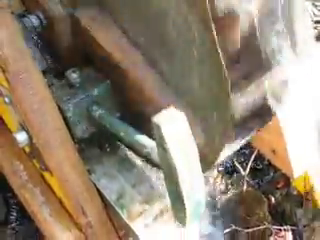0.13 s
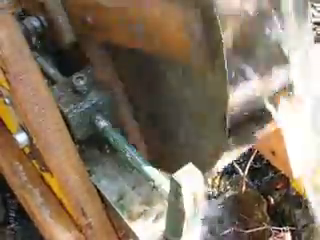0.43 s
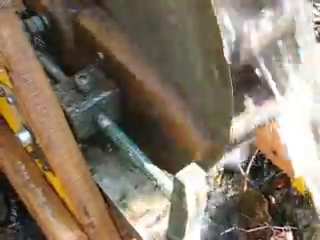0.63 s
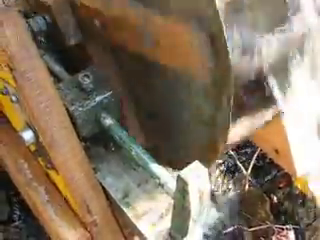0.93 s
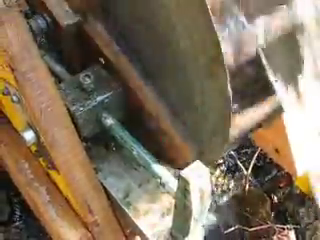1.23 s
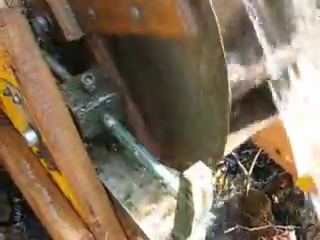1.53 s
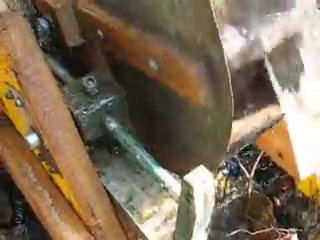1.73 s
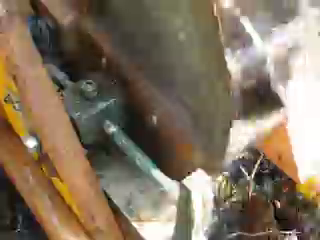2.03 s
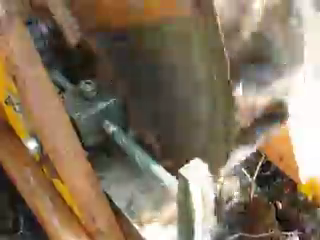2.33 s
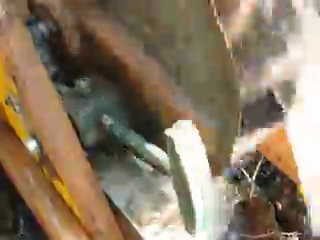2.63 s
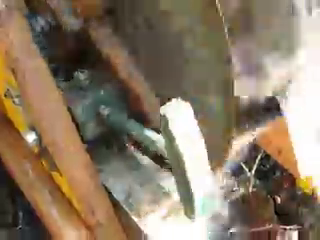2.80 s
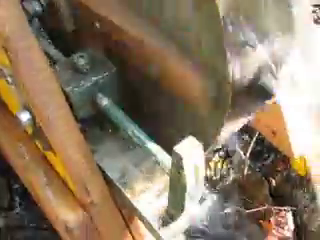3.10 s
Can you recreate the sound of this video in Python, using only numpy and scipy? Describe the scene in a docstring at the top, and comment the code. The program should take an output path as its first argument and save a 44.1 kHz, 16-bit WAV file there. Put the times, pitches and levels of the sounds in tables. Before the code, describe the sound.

Water splashing over a small water wheel, with ringing metal hammer taps and sharp knocks.

```python
"""Small water wheel with a hammer

A wheel turns in a stream, and water splashes over its paddles in a dense spray of drops and bubbles.
Its hammer strikes two ringing metal parts in turn, and moving air rumbles softly on the microphone.
Two sharp knocks and a snap right beside the microphone overload it. After each, the gain control
turns the sound down and slowly lets it back."""
import sys
import numpy as np
from scipy import signal
from scipy.io import wavfile
from scipy.ndimage import uniform_filter1d

SR = 44100
rng = np.random.default_rng(int(sys.argv[2]) if len(sys.argv) > 2 else 0)


def write(x):
    x = np.atleast_2d(x).T
    wavfile.write(sys.argv[1], SR, np.round(np.clip(x, -1, 1) * 32767).astype(np.int16))


N = 143766
TIME = np.arange(N) / SR
LAG_S, LAG_SPREAD_S = .00005, .000075  # how much later water is heard on the left, and how that varies


def from_db(db):
    """Turn decibels into a number to multiply a sound by."""
    return 10 ** (np.asarray(db) / 20)


def unit_power(x):
    """Scale a sound to an average power of one."""
    return x / np.sqrt(np.mean(x ** 2) + 1e-20)


def level_curve(rows):
    """Join (time, level) points into a gain for every sample."""
    return from_db(np.interp(TIME, *np.transpose(rows)))


def at_pitch(rows, hz):
    """Read a (pitch, value) table at any pitch."""
    pitches, values = np.transpose(rows)
    return np.interp(np.log(hz), np.log(pitches), values)


def pan(db):
    """Two gains that make the left side db louder than the right."""
    return from_db(np.array([[.5], [-.5]]) * db)


def band(x, hz, kind, order=2):
    """Keep the lows, the highs or a band; a higher order cuts more steeply."""
    sections = signal.butter(order, np.minimum(hz, .45 * SR), kind, fs=SR, output="sos")
    return signal.sosfilt(sections, x + 1e-18)


def drift(rate_hz):
    """A smooth random wobble about 1 in size, its extremes cut off."""
    pole = np.exp(-80 * np.pi * rate_hz / SR)
    slow = signal.lfilter([1], [1, -2 * pole, pole * pole], rng.standard_normal(N // 40 + 2002))[2000:]
    return np.interp(np.arange(N) / 40, np.arange(len(slow)), np.clip(unit_power(slow), -2.5, 1.5))


def fade(t, ring_s):
    """Die away by 60 dB in ring_s, the ring time."""
    return np.exp(-np.log(1000) * t / ring_s)


def ring(clicks, hz, ring_s):
    """Each click starts a fading tone."""
    decay, angle = fade(1 / SR, ring_s), 2 * np.pi * hz / SR
    return signal.lfilter([1, 0, -1], [1, -2 * decay * np.cos(angle), decay * decay], clicks + 1e-18)


def add(out, start_s, sound):
    """Mix a sound in at its start time."""
    start = int(start_s * SR)
    end = min(start + sound.shape[-1], N)
    out[:, start:end] += sound[:, :end - start]


def impacts(per_s, spread_db):
    """Random clicks of uneven size, each arriving from its own direction."""
    at = np.flatnonzero(rng.random(N) < per_s / SR)
    size, side = rng.random((2, N), dtype=np.float32)[:, at]
    size = from_db(spread_db * np.minimum(-np.log(size + 1e-9), 3.4))
    bearing = np.log((side + 1e-6) / (1 - side + 1e-6)) * np.sqrt(3) / np.pi
    lag = np.rint((LAG_S + LAG_SPREAD_S * bearing) * SR).astype(int)
    out = np.zeros((2, N))
    out[0, np.clip(at + lag, 0, N - 1)] = size
    out[1, at] = size
    return out


# Which side the water is heard on: (pitch [Hz], left minus right [dB])
WATER_SIDE = [(200, 0.5), (1000, -0.2), (2300, -6), (4000, -2.3)]
# The tone of the smooth rush: (pitch [Hz], relative level [dB])
RUSH_TONE = [(120, -24.5), (250, -10.5), (380, -19.5), (560, -5), (1000, 0), (1800, -6), (3400, 0.5),
             (6200, -2), (8000, -6)]
def rush(surge_db=1.5, flicker_db=2.5):
    """Countless small splashes merge into flickering noise, alike in both ears only in the bass."""
    out, surge, edges = 0, drift(14), np.geomspace(100, 11500, num=19)
    white = rng.standard_normal((2, 2, N))
    for k, (low, high) in enumerate(zip(edges, edges[1:])):
        middle, side = band(white[k % 2], [low, high], "band")
        hz = np.sqrt(low * high)
        alike = max(np.exp(-.5 * (2 * np.pi * hz * LAG_SPREAD_S) ** 2), .051)
        noise = np.sqrt(1 + alike) * middle + np.sqrt(1 - alike) * side * [[1], [-1]]
        gain = from_db(at_pitch(RUSH_TONE, hz) + surge_db * surge + flicker_db * drift(38))
        out += gain * pan(at_pitch(WATER_SIDE, hz)) * noise
    out[0] = np.roll(out[0], round(LAG_S * SR))
    return from_db(-21.5) * unit_power(out)


# The tone of the falling drops: (pitch [Hz], relative level [dB])
DROP_TONE = [(300, -11), (520, 1), (1000, -6.5), (1800, -3.5), (3300, 6.5), (5000, -3.5), (8000, -6.5)]
def drops(per_s=2200, ring_cycles=14.3):
    """Drops fall in clumps and ring briefly as bubbles; small high ones are the most common."""
    out, pitches, clumps = 0, np.geomspace(330, 8000, num=26), from_db(3.2 * drift(18))
    for hz in pitches:
        clicks = impacts(per_s * clumps * hz / pitches.sum(), spread_db=2.5)
        plinks = unit_power(ring(clicks, hz, ring_cycles / hz))
        gain = np.sqrt(hz) * from_db(at_pitch(DROP_TONE, hz))
        out += plinks * gain * pan(at_pitch(WATER_SIDE, hz))
    return from_db(-25) * unit_power(out)


def splats(fade_s=.0018):
    """Water slaps the paddles in tiny bright bursts."""
    slaps = impacts(per_s=210, spread_db=5.5)
    power = signal.lfilter([1], [1, -np.exp(-2 / (fade_s * SR))], slaps ** 2 + 1e-18)
    bursts = np.sqrt(power) * np.sign(rng.standard_normal((2, N)))
    return from_db(-28.5) * unit_power(band(bursts, [1890, 7370], "band")) * pan(-5.5)


# Loud gulps and drops of water: (time [s], starting pitch [Hz], level [dB])
LOUD_BUBBLES = [(.2119, 4420, -13), (.2345, 3200, -8.5), (.3635, 2480, -8), (.862, 930, -16),
                (1.196, 2470, -11), (1.292, 778, -10), (1.387, 1360, -7), (1.514, 830, -19.5),
                (1.558, 2020, -13.5), (1.590, 1390, -7), (1.662, 638, -16.5), (1.804, 2230, -13.5),
                (1.82, 950, -18), (1.851, 2050, -13.5), (1.878, 515, -15), (1.932, 496, -16),
                (2.226, 567, -14.5), (2.278, 3080, -15), (2.414, 2780, -12), (2.678, 452, -15.5),
                (2.745, 590, -15), (2.8, 668, -14), (2.908, 702, -20), (2.9245, 5250, -11.5)]
def bubbles(quiet_per_s=55, low_hz=900, high_hz=6000, rise=.45, swell_cycles=2.14):
    """Loud bubbles and many quiet random ones swell, then rise in pitch as they die in a little froth."""
    out, t, quiet = np.zeros((2, N)), TIME[:SR // 10], []
    for when, pitch, softness in rng.random((int(quiet_per_s * N / SR), 3)):
        hz = low_hz * (high_hz / low_hz) ** pitch
        db = -21.5 - .5 * min(-np.log(1 - softness), 2)
        quiet.append((when * N / SR, hz, db))
    for start_s, hz, db in LOUD_BUBBLES + quiet:
        ring_s = .064 * min(1, 1000 / hz) ** (2 / 3)  # smaller, higher bubbles die sooner
        tone = np.sin(2 * np.pi * hz * t * (1 + .5 * rise * np.minimum(t / ring_s, 1)))
        froth = .62 * unit_power(ring(rng.standard_normal(len(t)), hz, 1 / (.33 * hz)))
        shape = (1 - np.exp(-t * hz / swell_cycles)) * fade(t, ring_s)
        add(out, start_s, from_db(db) * shape * (tone + froth) * pan(at_pitch(WATER_SIDE, hz)))
    return out


# How loud the water is heard, with an extra dip as the gain drops after the last knock:
# (time [s], level [dB])
WATER_LEVEL = [(0, 1), (.3, -1), (.65, -3), (1.0, -0.5), (1.4, 1), (1.8, 0), (2.2, 2.5), (2.62, 0),
               (2.86, 4), (3.02, -5.5), (3.26, 1.5)]
def water(top_hz=7850):
    """The splashing grows louder and softer; its highest treble is only a faint mist."""
    splashing = (rush() + drops() + splats()) * level_curve(WATER_LEVEL) + bubbles()
    mist = from_db(-12) * band(splashing, top_hz, "high", order=4)
    return band(splashing, top_hz, "low", order=12) + mist


# Air pushing on the microphone: (time [s], level [dB])
AIR_LEVEL = [(0, -49.5), (1.65, -47.5), (1.8, -34), (1.95, -48), (3.26, -44.5)]
def air_rumble():
    """Moving air rumbles separately on each side of the microphone."""
    lows = band(rng.standard_normal((2, N)), 75, "low")
    return unit_power(band(lows, 22.4, "high")) * level_curve(AIR_LEVEL) * pan(3.5)


def struck(tones, lag_s=0):
    """One blow sets a part ringing with several tones, heard lag_s later on the left."""
    out, t = 0, np.maximum(TIME[:SR] - np.array([[lag_s], [0]]), 0)
    for k, (hz, db, ring_s) in enumerate(tones):
        out += (-1) ** k * from_db(db) * np.sin(2 * np.pi * hz * t) * fade(t, ring_s)
    return out


def crack(fade_s=.0017):
    """The instant of contact: a very short burst of noise."""
    burst = rng.standard_normal((2, SR)) * np.exp(-TIME[:SR] / fade_s)
    return band(burst, 7100, "low", order=6)


# The tones of the first metal part: (pitch [Hz], level [dB], ring time [s])
CLANK_TONES = [(1259, -35, 1.2), (2928, -32, 1.0), (3535, -24, .45), (4126, -26.5, .8), (4626, -31, 1.1),
               (6665, -31.5, .6), (9198, -29, .16), (9422, -28, .18)]
# Hammer blows on it: (time [s], strength [dB], favoured pitch [Hz], thud level [dB])
CLANK_BLOWS = [(0.127, -0.5, 4450, -8.5), (.901, -1, 4370, -11), (1.686, -1.5, 6665, -10.5),
               (2.466, 0.5, 3530, -11), (3.243, -1, 3980, -10.5)]
def clanks(boost_db=8, width_octaves=.11, thud_hz=545, thud_ring_s=.024):
    """The hammer ticks on metal and the frame thuds; each spot it hits favours a different pitch."""
    out = np.zeros((2, N))
    for start_s, db, favoured_hz, thud_db in CLANK_BLOWS:
        tones = []
        for hz, level, ring_s in CLANK_TONES:
            nearness = np.exp(-(np.log2(hz / favoured_hz) / width_octaves) ** 2)
            tones.append((hz, db + level + boost_db * nearness, ring_s))
        tones.append((thud_hz, thud_db, thud_ring_s))
        add(out, start_s, struck(tones, LAG_S / 2) + from_db(db - 10) * crack())
    return band(out, 364, "high")


def close_blow(start_s, db, tones):
    """A crack and a very short ring; the harder the blow, the more the crack stands out."""
    out = np.zeros((2, N))
    add(out, start_s, from_db(db) * (struck(tones) + from_db(8 + db) * crack()))
    return band(out, 170, "high", order=1)


# The tones of a knock: (pitch [Hz], level [dB], ring time [s])
KNOCK_TONES = [(570, -11, .025), (890, -16, .04), (1900, -12, .035), (2800, -11, .02), (3822, -11, .095),
               (4050, 4, .03), (4230, -10, .07), (7500, -2, .012), (8800, -6, .018)]
# Knocks and rebounds: (time [s], strength [dB], drop either side of the main tone [dB per octave])
KNOCK_BLOWS = [(0.3946, 1, -2), (0.4298, -5.5, 13), (2.936, 2, -2.5), (2.9658, -5, 12)]
def knocks(main_hz=4050):
    """Two hard knocks beside the microphone, each with a softer, purer rebound."""
    out = 0
    for start_s, db, drop in KNOCK_BLOWS:
        tones = [(hz, level - drop * abs(np.log2(hz / main_hz)), ring_s)
                 for hz, level, ring_s in KNOCK_TONES]
        out += close_blow(start_s, db, tones)
    return out


# The tones of the second metal part: (pitch [Hz], level [dB], ring time [s])
CHIME_TONES = [(1802, -28.5, 1.4), (6109, -26, .6), (7385, -32, .4)]
# Hammer blows on it: (time [s], strength [dB], brightness [dB per octave], ring length [times usual])
CHIME_BLOWS = [(0.511, -5, -7.5, 1.4), (1.297, 2, -3, 1.26), (2.076, 5.5, -2.5, 0.89),
               (2.856, 5.5, 0.5, 0.55)]
def chimes(pivot_hz=2480):
    """Between clanks the hammer rings the second metal part, never at quite the same spot."""
    out = np.zeros((2, N))
    for start_s, db, brightness, length in CHIME_BLOWS:
        tones = [(hz, db + level + brightness * np.log2(hz / pivot_hz), ring_s * length)
                 for hz, level, ring_s in CHIME_TONES]
        add(out, start_s, struck(tones, LAG_S / 2))
    return band(out, 364, "high")


# The tones of the snapping part: (pitch [Hz], level [dB], ring time [s])
SNAP_TONES = [(1050, -13, .03), (2810, -7, .02), (4330, -3, .022), (5890, -1.5, .028), (7600, -3, .02)]
def snap():
    """Another close part snaps once, brighter than the knocks."""
    return close_blow(start_s=1.0413, db=.5, tones=SNAP_TONES)


def scene():
    """The water, the wheel's mechanism and the air, heard together."""
    return water() + clanks() + knocks() + chimes() + snap() + air_rumble()


def gain_control(x, above_db=-5.5, duck_db=-12, attack_s=.0049, hold_s=.089, release_s=.16):
    """An overload pulls the volume down fast; it is held there, then creeps back."""
    block = 32  # samples between updates
    power = uniform_filter1d(np.mean(x ** 2, axis=0), size=96)[::block]
    level_db = 10 * np.log10(np.abs(power) + 1e-12)
    overload = np.clip((level_db - above_db) / 3, 0, 1)  # full effect at 3 dB too loud
    step_s, gain_db, aim_db, hold_left_s, gains_db = block / SR, 0, 0, 0, []
    for wanted_db in duck_db * overload:
        hold_left_s -= step_s
        if wanted_db <= aim_db or hold_left_s <= 0:
            aim_db, hold_left_s = wanted_db, hold_s
        glide_s = attack_s if aim_db < gain_db else release_s
        gain_db += (aim_db - gain_db) * (1 - np.exp(-step_s / glide_s))
        gains_db.append(gain_db)
    return x * from_db(np.interp(TIME, TIME[::block], gains_db))


def record(dry):
    """A dull microphone, gain control, clipped peaks and a steep cut of the highest treble."""
    dull = band(dry, 10400, "low", order=14)
    clipped = np.clip(gain_control(dull), -1, 1)
    return band(clipped, 14000, "low", order=12)


dry = scene()
out = record(dry)
write(out)
```